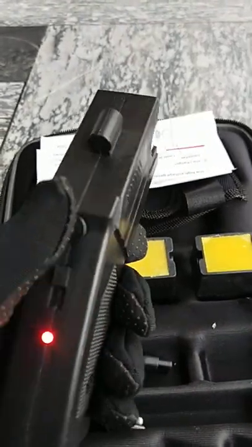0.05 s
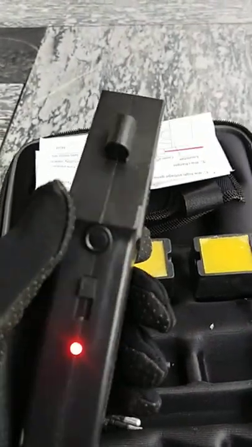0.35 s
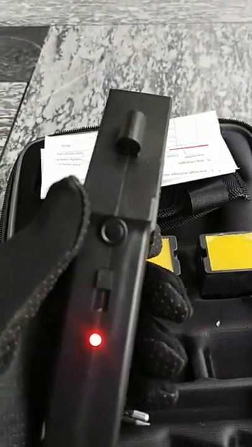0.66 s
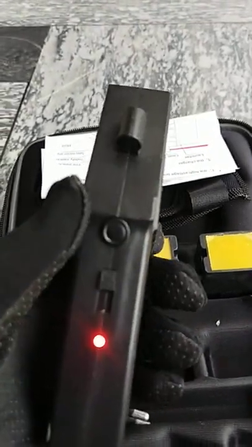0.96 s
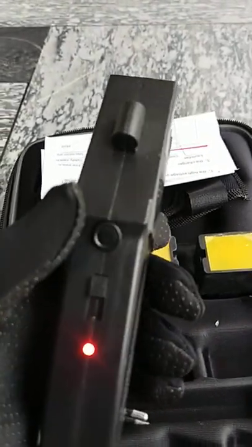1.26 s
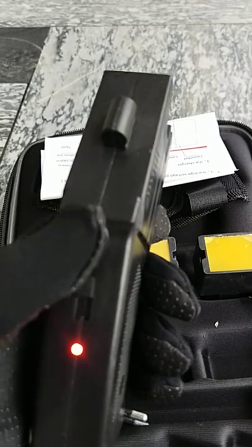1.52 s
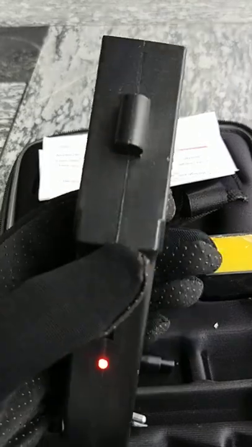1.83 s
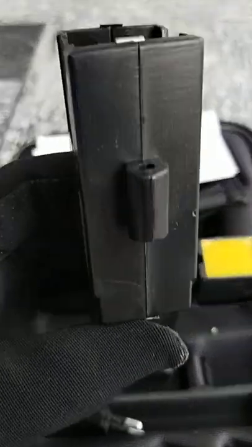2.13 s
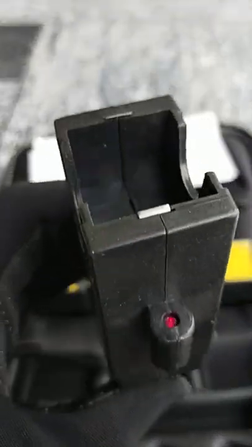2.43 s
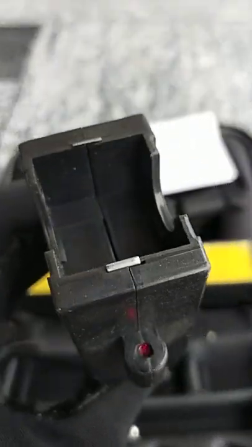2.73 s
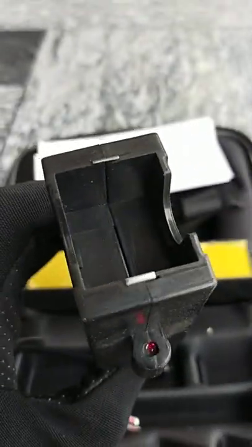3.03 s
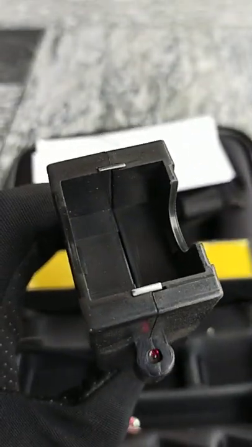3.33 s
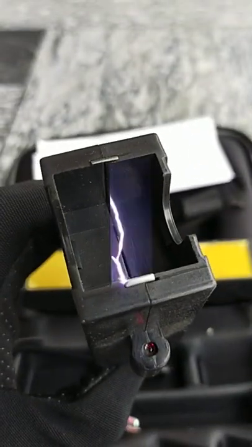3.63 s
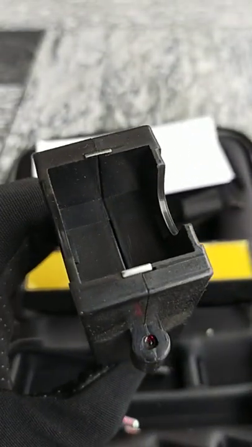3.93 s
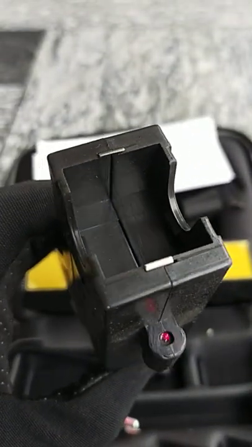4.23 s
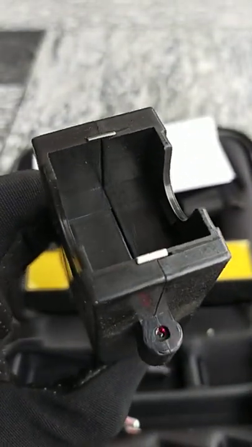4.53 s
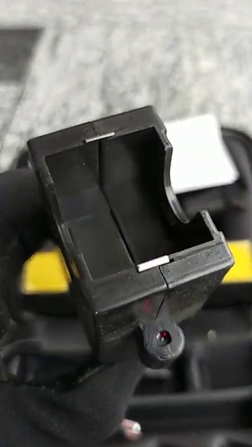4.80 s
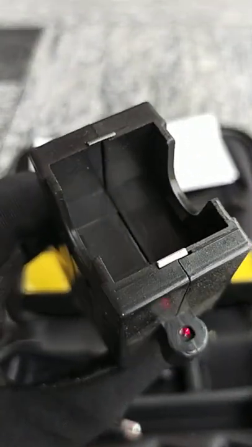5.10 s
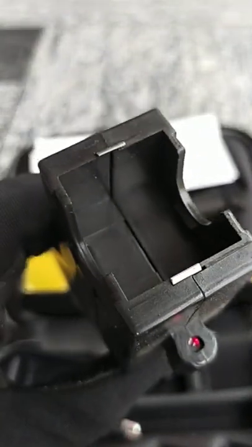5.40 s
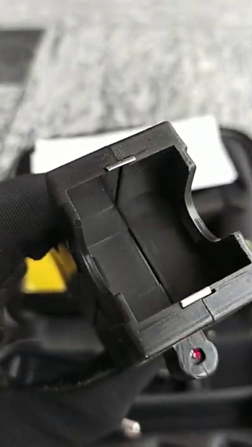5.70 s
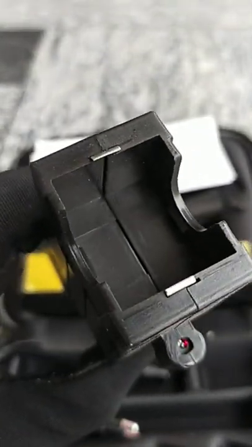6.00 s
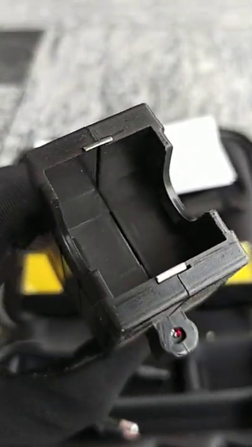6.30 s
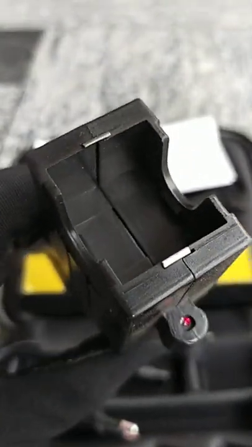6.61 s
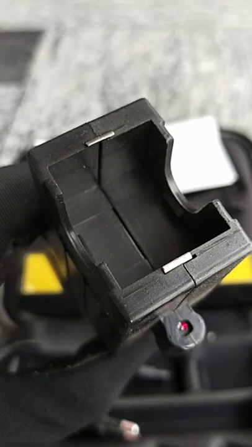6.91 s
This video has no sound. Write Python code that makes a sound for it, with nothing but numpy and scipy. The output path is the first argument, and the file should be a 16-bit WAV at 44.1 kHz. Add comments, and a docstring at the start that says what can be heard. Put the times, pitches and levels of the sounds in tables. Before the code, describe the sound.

Soft air noise and a distant machine drone fill a room while a gloved hand lightly rubs a stun gun near the microphone. A faint high whine rises with a plastic trigger click, then the device fires seven separate sparks at uneven intervals. Each is a bright, hard crack with a slight thump and a brief fluttering, hissy tail. Quieter trigger clicks sound among the later sparks, and the hum continues.

```python
"""Stun device in a humming room.

Air noise, a distant machine and faint moans lie under a glove rubbing the plastic case. The trigger
clicks, a thin whine swells, and seven single sparks snap. Each arc rings the muzzle and flutters
between the walls; gain control clamps down on it, then lets go, so the hissing tail swells back up."""
import sys
import numpy as np
from scipy import signal
from scipy.fft import rfft, irfft
from scipy.io import wavfile
from scipy.ndimage import uniform_filter1d, minimum_filter1d

SR = 44100
rng = np.random.default_rng(int(sys.argv[2]) if len(sys.argv) > 2 else 0)


def master(y):
    """Save y as 16-bit WAV."""
    cut = np.clip(np.atleast_2d(y).T, -1, 1)
    pcm = np.round(cut * 32767)  # scale
    wavfile.write(sys.argv[1], SR, pcm.astype(np.int16))


N = 306495
TIME_S = np.arange(N) / SR

# Spectra of air, glove, trigger, room echo and arc. Each row: frequency in Hz, relative level in dB.
AIR_SPECTRUM = [(20, -28), (35, -13.5), (60, -13), (90, -9), (170, -6), (260, -14), (370, -12),
                (460, -16.5), (640, -14.5), (900, -12.5), (1400, -16.5), (2200, -18.5), (5600, -34),
                (9000, -35), (12000, -44), (16000, -46.5)]
GLOVE_SPECTRUM = [(1000, -29), (3500, -2), (6000, -5.5), (10000, -12), (14000, -17), (16000, -20)]
TRIGGER_SPECTRUM = [(300, -43.5), (900, -2), (1200, 5.5), (1900, 3), (2300, -10), (3200, -2), (4800, -16.5),
                    (7500, 0), (11000, -12), (16000, -16.5)]
ECHO_SPECTRUM = [(60, -20), (200, -18), (700, -11), (1100, -11), (1450, -14.5), (1900, -11.5), (2900, -6.5),
                 (4200, -8.5), (5000, -22), (5700, -13.5), (6500, -3), (7400, 3.5), (8300, 0), (10000, 1),
                 (11300, -4), (12300, -8), (15200, 2.5), (15800, -5), (16200, -44.5)]
ARC_SPECTRUM = [(60, -22), (160, -13), (350, -6), (700, -8.5), (1000, -10.5), (1500, -8.5), (2900, -11),
                (4300, -17.5), (5200, -21), (5900, -16.5), (7000, -3), (9500, -6.5), (12000, -6.5),
                (15000, -1), (17000, -30.5)]
# Left-right likeness of room noise. Each row: frequency in Hz, coherence from 0 to 1.
COHERENCE = [(30, 0.96), (140, 1), (300, 0.91), (700, 0.21), (1500, 0.11), (6000, 0.076), (16000, .05)]
# Humming room resonances. Each row: centre in Hz, width in Hz, level in dB.
HUM_BANDS = [(158.1, 12, -62.5), (190, 5.7, -66), (280.4, 5.8, -68.5), (531.5, 3, -67.5),
             (774.6, 21, -61.5), (1015.8, 9.3, -69), (7040, 650, -70.5)]
# Envelopes of the rumble, the whine and the band below it. Each row: time in seconds, gain in dB.
RUMBLE_ENVELOPE = [(0, 0.5), (3.5, 0), (4.4, 3.5), (5.3, 1.5), (5.7, 1), (6.3, 5.5), (6.95, 7.5)]
WHINE_ENVELOPE = [(3.14, -80), (3.19, -59.5), (3.25, -48.5), (3.35, -47.5), (3.43, -51), (3.49, -47),
                  (3.65, -44), (3.73, -47.5), (3.95, -44), (4.3, -70)]
UNDERTONE_ENVELOPE = [(2.8, -82), (2.95, -65), (3.09, -54.5), (3.2, -59), (3.65, -59), (4.0, -54),
                      (4.3, -76)]
# Distant machine. Each row: time in seconds, lower pitch in Hz, lower and upper tone levels in dB.
MACHINE_DRONE = [(0, 143, -63, -54), (0.3, 141.5, -52.5, -58), (0.9, 141.7, -55.5, -59),
                 (1.7, 141.4, -54.5, -62.5), (2.3, 141, -57.5, -51.5), (2.8, 139.1, -59, -54.5),
                 (3.4, 141.9, -51.5, -61), (4.15, 144.2, -46.5, -58), (4.9, 145.4, -55, -56),
                 (5.65, 141.3, -48.5, -56), (6.2, 138.4, -52, -50.5), (6.9, 143.4, -49.5, -54.5)]
# Fainter hum tones. Each row: pitch in Hz, level in dB.
ROOM_TONES = [(94.2, -62), (119.5, -62), (235, -61), (308.5, -67), (380, -69.5)]
# Moans. Each row: start and length in seconds, pitch in Hz, glide in Hz/s, level in dB, width in Hz.
MOAN_EVENTS = [(-0.4, 1.1, 767, -0.5, -57.5, 50), (1.797, 0.94, 742.7, 31.5, -58, 52),
               (4.05, 2.11, 1032, 58, -52.5, 94), (6.08, 0.93, 782.3, 21.5, -50.5, 22)]
# Glove strokes. Each row: midpoint and length in seconds, level in dB, centre in Hz, treble in dB.
GLOVE_STROKES = [(2.36, 0.05, -57.5, 6600, 5), (2.45, 0.34, -57.5, 6830, 7), (2.512, 0.075, -61, 7200, 1),
                 (3.59, 0.228, -62, 7200, -12), (5.376, 0.59, -61.5, 7100, -14)]
# Glove slips. Each row: midpoint and length in seconds, level in dB, pitch in Hz, relative rub in dB.
GLOVE_SLIPS = [(0.752, 0.23, -68, 5050, 3), (1.729, 0.27, -64, 3620, -6), (1.942, 0.28, -69.5, 5200, 4)]
# Reverberation. Each row: frequency in Hz, time to fall 60 dB in seconds.
ROOM_DECAY = [(200, 0.39), (1500, 0.75), (3500, 0.67), (7500, 0.55), (11000, 0.43), (15000, 0.33)]
# Resonances of the room and the open muzzle. Each row: centre in Hz, width in Hz, boost in dB.
ROOM_RESONANCES = [(2725, 154, 5), (3590, 160, 5.5), (4270, 110, 5.5)]
MUZZLE_RESONANCES = [(780, 120, 5), (1074, 85.5, 4), (1540, 150, 2), (1885, 150, 3.5), (2550, 101, 4),
                     (2840, 94, 9.5), (3170, 101, 4.5), (3666, 100, 6.5), (4240, 160, 8), (6630, 105, 1.5),
                     (7654, 130, 5.5)]
# Trigger presses and releases. Each row: start in seconds, then relative level, left over right
# and bite in dB.
TRIGGER_CLICKS = [(3.4514, -35, 2, 4), (5.225, -31.5, 6.5, -4), (5.686, -34, 3, 4.5), (6.637, -31, -1, 7.5)]
# Discharges. Each row: start in seconds, strength in dB, thump in dB, low swell in Hz and dB,
# high swell in Hz and dB, notch in Hz, bite in dB, treble in dB, left over right in dB,
# thump's lead on the right in ms, echo in dB, echo's top treble in dB.
DISCHARGES = [(3.7390, -0.5, -3.5, 730, 3.4, 2700, 8.3, 410, -3.5, -12.5, 1.2, -0.054, 0, -4),
              (3.98, 0.84, 1.5, 352, 7.4, 2200, 2.7, 580, 4, -5.5, 1.86, 0.26, 0.28, -3),
              (4.5808, -0.51, 0, 646, 7.1, 1540, 1.6, 1220, -2, -6.5, 0.76, 0.47, 0.26, -8),
              (4.8679, 2.3, 2.5, 560, 6, 2620, 0.85, 1400, 3.5, -6.5, 2.2, 0.15, 0, -5),
              (5.9005, -1.1, 1, 1120, 14.6, 1993, 2, 670, -1, -1, 4.8, -0.38, 0.083, -1),
              (6.1686, 1.3, 1.5, 910, 7, 2500, 6.7, 394, 6.5, -1.5, 1.7, 0.59, 0, 0.5),
              (6.4863, 1.42, 0.5, 438, 6.1, 3360, 7.4, 1500, 6.5, 0.5, 1.2, 1, 0.24, 0.5)]


def amp(db):
    """Decibels to gain."""
    return 10 ** (np.asarray(db) / 20)


def unit(x):
    """Scale to rms 1."""
    return x / np.sqrt(np.mean(x ** 2) + 1e-20)


def pan(left_over_right_db):
    """Stereo gain pair."""
    return amp([[left_over_right_db / 2], [-left_over_right_db / 2]])


def over_hz(points, hz):
    """Interpolate on a log-frequency axis."""
    point_hz, value = np.transpose(points)
    return np.interp(np.log(hz + 1), np.log(point_hz + 1), value)


def over_time(points):
    """Interpolate over the scene's duration."""
    return np.interp(TIME_S, *np.transpose(points))


def bins(x):
    """FFT frequencies in Hz."""
    return np.fft.rfftfreq(x.shape[-1], 1 / SR)


def colour(x, db):
    """Filter by a gain per frequency."""
    return irfft(rfft(x) * amp(db), x.shape[-1])


def bump(hz, centre_hz, octaves):
    """Bell of height 1 in log frequency."""
    return np.exp(-.5 * (np.log2((hz + 1) / centre_hz) / octaves) ** 2)


def band_db(hz, centre_hz, width_hz):
    """Resonance with steep skirts."""
    return -20 * np.log10(1 + ((hz - centre_hz) / width_hz) ** 2)


def rings_db(rings, hz):
    """Summed boost of a set of resonances."""
    return sum(db * np.exp(-.5 * ((hz - centre_hz) / width_hz) ** 2) for centre_hz, width_hz, db in rings)


def add(mix, start_s, sound):
    """Mix in a stereo sound."""
    part = mix[:, round(start_s * SR):][:, :sound.shape[1]]
    part += sound[:, :part.shape[1]]


def grain(shape, span):
    """Noise averaged over span points, rms 1."""
    return unit(uniform_filter1d(rng.standard_normal(shape), size=span))


def waver(rate_hz, shape=N):
    """Low-passed random drift, rms 1."""
    return unit(colour(rng.standard_normal(shape), band_db(bins(TIME_S), 0, rate_hz)))


def fuzzy_tone(start_s, start_hz, glide_hz_per_s, width_hz):
    """Gliding narrow noise band, rms 1."""
    drift = waver(width_hz, (2, 2, N))
    phase = 2 * np.pi * np.cumsum(start_hz + glide_hz_per_s * (TIME_S - start_s)) / SR
    tone = drift[0] * np.cos(phase) + drift[1] * np.sin(phase)
    return unit(tone + 0.15 * tone[::-1])


def diffuse_noise(lag_s=0.00015):
    """Stereo room noise: alike in the bass, unrelated in the treble, right side first."""
    common, separate = rfft(rng.standard_normal((2, N)))
    hz = bins(TIME_S)
    coherence = over_hz(COHERENCE, hz)
    left = common * np.exp(-2j * np.pi * hz * lag_s)
    right = coherence * common + np.sqrt(1 - coherence ** 2) * separate
    return irfft(np.array([left, right]), N)


def burst(hold_s, fall_s, mono_below_hz=70, size=2048):
    """Time axis and a near-white stereo crack that starts mid-frame."""
    t = (np.arange(size) - size // 2) / SR
    envelope = (t >= 0) * np.exp(-np.maximum(t - hold_s, 0) / fall_s)
    noise = rng.standard_normal((2, size))
    apart = bins(noise) / (bins(noise) + mono_below_hz)
    for _ in range(5):  # each pass flattens the spectrum
        spectrum = rfft(noise * envelope)
        spectrum[1] = apart * spectrum[1] + (1 - apart) * spectrum[0]
        noise = irfft(spectrum / (abs(spectrum) + 1e-12))
    return t, noise * envelope


def room_air(air_db=-50, grows_from_s=3, growth_db_per_s=0.37):
    """Rumble and humming resonances under soft air noise that slowly grows."""
    hz = bins(TIME_S)
    air = amp(air_db) * unit(colour(diffuse_noise(), over_hz(AIR_SPECTRUM, hz)))
    for centre_hz, width_hz, db in HUM_BANDS:
        air += amp(db) * unit(colour(diffuse_noise(), band_db(hz, centre_hz, width_hz)))
    rumble = colour(air, band_db(hz, 0, width_hz=730))
    growth_db = growth_db_per_s * np.maximum(TIME_S - grows_from_s, 0)
    return rumble * amp(over_time(RUMBLE_ENVELOPE)) + (air - rumble) * amp(growth_db)


def machine_hum(waver_db=2.0, waver_hz=2.5, pitch_wander=0.00404, lag_s=0.000081):
    """A distant machine drones on two tones a fifth apart, over fainter room tones; all waver."""
    times_s, *tracks = np.transpose(MACHINE_DRONE)
    pitch_hz, lower_db, upper_db = (np.interp(TIME_S, times_s, track) for track in tracks)
    out = np.zeros((2, N))
    for hz, db in [(pitch_hz, lower_db), (1.5 * pitch_hz, upper_db)] + ROOM_TONES:
        cycles = rng.random() + np.cumsum(hz * (1 + pitch_wander * waver(waver_hz))) / SR
        tone = np.sqrt(2) * np.sin(2 * np.pi * np.array([cycles - hz * lag_s, cycles]))
        out += amp(db + waver_db * waver(waver_hz)) * tone
    return out


def moans(roundness=0.63):
    """Faint fuzzy tones, each swelling and fading once."""
    out = np.zeros((2, N))
    for start_s, length_s, hz, glide_hz_per_s, db, width_hz in MOAN_EVENTS:
        arch = abs(np.sin(np.pi * np.clip((TIME_S - start_s) / length_s, 0, 1))) ** roundness
        out += amp(db) * arch * fuzzy_tone(start_s, hz, glide_hz_per_s, width_hz)
    return out


def glove_brushes(focus_db=12, grain_db=3):
    """Cloth drags over the case in short grainy strokes."""
    out = np.zeros((2, N))
    for mid_s, length_s, db, centre_hz, treble_db in GLOVE_STROKES:
        size = int(length_s * SR)
        friction = rng.standard_normal((2, size)) * amp(grain_db * grain(size, span=60))
        hz = bins(friction)
        shape_db = over_hz(GLOVE_SPECTRUM, hz) + focus_db * bump(hz, centre_hz, 0.118)
        shape_db += treble_db * bump(hz, 15000, 0.27)
        add(out, mid_s - length_s / 2, amp(db) * unit(colour(friction, shape_db)) * np.hanning(size))
    return out


def glove_squeaks(tone_width_hz=85, rub_width_hz=800, grain_db=4.5):
    """The glove slips on plastic: a faint tone in scratchy rubbing noise."""
    out = np.zeros((2, N))
    for mid_s, length_s, db, pitch_hz, rub_db in GLOVE_SLIPS:
        size = int(length_s * SR)
        tone, rub = rng.standard_normal((2, 2, size))
        hz = bins(tone)
        rub *= amp(grain_db * grain(size, span=200))
        rub = amp(rub_db) * unit(colour(rub, band_db(hz, pitch_hz, rub_width_hz)))
        tone = unit(colour(tone, band_db(hz, pitch_hz, tone_width_hz)))
        add(out, mid_s - length_s / 2, amp(db) * (tone + rub) * np.hanning(size))
    return out


def wall_flutter(tail, t, trip_s=0.01984, pass_s=0.002, boost_db=8, above_hz=5500):
    """Treble bounces between facing walls, pulsing the tail once per round trip."""
    treble = colour(tail, -10 * np.log10(1 + (above_hz / (bins(tail) + 1)) ** 8))
    pulses = np.exp(-((t - np.round(t / trip_s) * trip_s) / pass_s) ** 2)
    depth = .45 + .55 * np.exp(-((t - .142) / .025) ** 2)  # peaks once the first scatter thins
    return tail + treble * (amp(boost_db * pulses * depth) - 1)


def room_tail(gain_db=-22, onset_s=0.015, spread_s=0.042, patch_db=3.2, early_db=2):
    """Reverberation: spreads, rings in a few bands and decays in grainy patches."""
    t = np.arange(SR) / SR
    noise = rng.standard_normal((2, SR))
    hz = bins(noise)
    side_db = bump(hz, 14750, 0.18) * np.array([[3], [-3]])  # top treble leans left
    noise = unit(colour(noise, over_hz(ECHO_SPECTRUM, hz) + rings_db(ROOM_RESONANCES, hz) + side_db))
    band_hz, frame_s, frames = signal.stft(noise, SR, nperseg=256)
    patches = uniform_filter1d(rng.standard_normal(frames.shape[1:]), size=2, axis=0)
    patches = unit(uniform_filter1d(patches, size=6, axis=1))
    ripple_db = patch_db * patches * bump(band_hz, 3200, 1.2)[:, None]
    age_s = np.hypot(frame_s, spread_s) - spread_s
    decay_db = 60 * age_s / over_hz(ROOM_DECAY, band_hz)[:, None]
    tail = signal.istft(frames * amp(ripple_db - decay_db), SR, nperseg=256)[1][:, :SR]
    near_walls_db = early_db * np.exp(-((t - .018) / .011) ** 2)
    fade_in = np.clip((t - onset_s) / .0025 + 1, 0, 1)
    return wall_flutter(tail, t) * amp(gain_db + near_walls_db) * fade_in * pan(0.8)


def trigger(gain_db=30, room_db=-43):
    """The plastic switch clicks, short and nearly dry."""
    out = np.zeros((2, N))
    for start_s, db, pan_db, bite_db in TRIGGER_CLICKS:
        t, click = burst(hold_s=.0018, fall_s=.0025)
        hz = bins(click)
        click = colour(click, over_hz(TRIGGER_SPECTRUM, hz) + bite_db * bump(hz, 3800, 0.25))
        add(out, start_s + t[0], amp(db + gain_db) * click * pan(pan_db))
        add(out, start_s, amp(db + gain_db + room_db) * room_tail())
    return out


def whine(pitch_hz=2827, glide_hz_per_s=-55, core_db=-6.5, skirt_db=-2, top_hz=3090):
    """A sagging narrow core in a rough skirt, over a weaker, rising band."""
    start_s = WHINE_ENVELOPE[0][0]
    core = amp(core_db) * fuzzy_tone(start_s, pitch_hz, glide_hz_per_s, width_hz=26)
    skirt = fuzzy_tone(start_s, pitch_hz, glide_hz_per_s, width_hz=250)
    shelf_db = -12 * np.clip((bins(TIME_S) - top_hz) / 60 + .5, 0, 1)
    skirt = amp(skirt_db) * unit(colour(skirt, shelf_db))
    undertone = fuzzy_tone(UNDERTONE_ENVELOPE[0][0], start_hz=2450, glide_hz_per_s=98, width_hz=65)
    undertone *= amp(over_time(UNDERTONE_ENVELOPE))
    return (core + skirt) * amp(over_time(WHINE_ENVELOPE)) + undertone


def pressure_swing(t, lead_ms, rise_s=0.00034, half_period_s=0.004, fade_s=0.0026):
    """The arc's thump: one sudden swing of pressure, spectral peak 1."""
    age_s = np.array([t, t + lead_ms / 1000])
    envelope = np.clip(age_s / rise_s, 0, 1) * np.exp(-(age_s / fade_s) ** 2)
    swing = -envelope * np.cos(np.pi * age_s / half_period_s)
    return swing / abs(rfft(swing)).max()


def arc_snap(thump_db, low_hz, low_db, high_hz, high_db, notch_hz, bite_db, treble_db, pan_db, lead_ms,
             gain_db=36.5, thump_gain_db=3, notch_db=8, ragged_db=4, detune=0.0044):
    """The arc cracks for about two milliseconds and rings the muzzle, over a thump."""
    t, crack = burst(hold_s=0.0022, fall_s=0.0019)
    hz = bins(crack)
    shape_db = over_hz(ARC_SPECTRUM, hz)
    shape_db += treble_db * bump(hz, 11800, 0.7) + bite_db * bump(hz, 4000, 0.3)
    shape_db += low_db * bump(hz, low_hz, 0.25) + high_db * bump(hz, high_hz, 0.34)
    shape_db += rings_db(MUZZLE_RESONANCES, hz * (1 + detune * rng.standard_normal()))
    # No two arcs crack alike.
    scatter_db = ragged_db * (grain((2, len(hz)), span=12) - .35) * hz / (hz + 2500)
    crack = colour(crack, shape_db + scatter_db)
    thump = amp(thump_gain_db + thump_db) * pressure_swing(t, lead_ms)
    snap = colour(crack + thump, -notch_db * bump(hz, notch_hz, 0.11))
    gate = np.exp(-((t - .0018) / .0045) ** 4)
    return amp(gain_db) * snap * gate * pan(pan_db)


def sparks(ripple_gain=0.13, moved=0.5, lead_samples=1024):
    """Each discharge: the direct snap, then the same room, changed as the hand moves."""
    out, room = np.zeros((2, N)), room_tail()
    for start_s, strength_db, *timbre, echo_db, top_db in DISCHARGES:
        add(out, start_s - lead_samples / SR, amp(strength_db) * arc_snap(*timbre))
        tail = np.sqrt(1 - moved ** 2) * room + moved * room_tail()
        arc = rng.standard_normal((1, 90))  # each arc's own spectral ripple
        tail += ripple_gain * signal.oaconvolve(tail, arc / np.linalg.norm(arc))[:, :SR]
        tail = colour(tail, echo_db + top_db * bump(bins(tail), 19000, 0.35))
        clumps_db = grain(SR, span=130)  # reflections arrive in clumps
        add(out, start_s, amp(strength_db + clumps_db) * tail)
    return out


def scene():
    """Stereo sum at the microphones."""
    sustained = room_air() + machine_hum() + whine() + moans()
    return sustained + trigger() + glove_brushes() + glove_squeaks() + sparks()


def peak_hold(x, hold_s):
    """Maximum over the last hold_s."""
    size = 2 * int(hold_s * SR / 2) + 1
    return -minimum_filter1d(-x, size, origin=size // 2)


def gain_control(dry, threshold_db=-15, slope=0.99, ahead_s=0.0052, hold_s=0.0033,
                 max_duck_db=17, let_go_db=9, recover_s=0.023):
    """A look-ahead limiter clamps each snap; a slower stage holds, lets go with a step and recovers."""
    power_db = 10 * np.log10(abs(uniform_filter1d((dry ** 2).mean(0), size=100)) + 1e-12)
    over_db = slope * np.maximum(power_db - threshold_db, 0)
    ahead_db = np.roll(peak_hold(over_db, hold_s + ahead_s), -int(ahead_s * SR))
    limit_db = uniform_filter1d(ahead_db, size=160)
    duck_db = peak_hold(np.clip(2 * (over_db - 10.5), 0, max_duck_db), hold_s=.085)
    pole = np.exp(-1 / (recover_s * SR))
    recovery_db = signal.lfilter([1 - pole], [1, -pole], np.maximum(duck_db - let_go_db, 0))
    return dry * amp(-np.max([limit_db, duck_db, recovery_db], axis=0))


def record(dry, ceiling=0.58, low_cut_hz=70, high_cut_hz=16500):
    """Gain control, soft saturation of the peaks, then band limits."""
    out = ceiling * np.tanh(gain_control(dry) / ceiling)
    out = signal.sosfilt(signal.butter(2, low_cut_hz, "highpass", fs=SR, output="sos"), out)
    lowpass = signal.firwin(255, high_cut_hz, window=("kaiser", 9), fs=SR)
    return signal.oaconvolve(out, lowpass[None], "same")


dry = scene()
out = record(dry)
master(out)
```